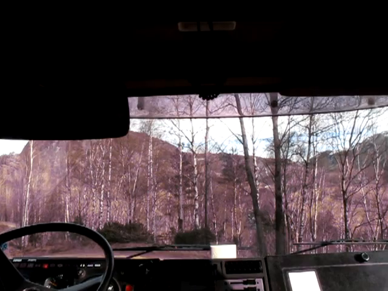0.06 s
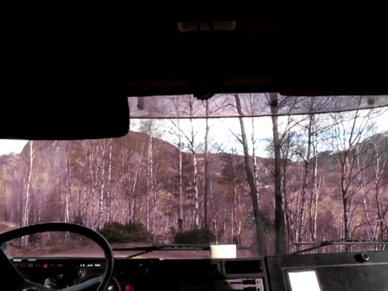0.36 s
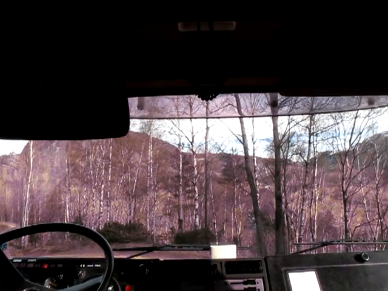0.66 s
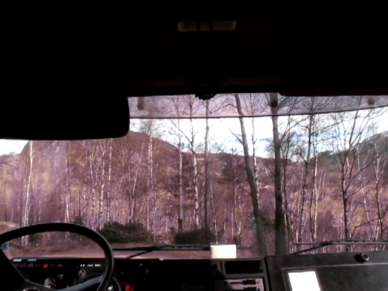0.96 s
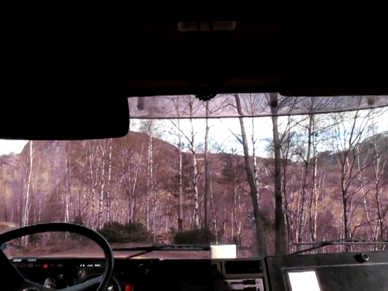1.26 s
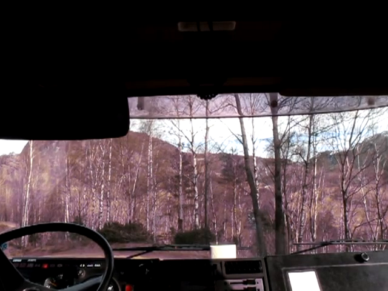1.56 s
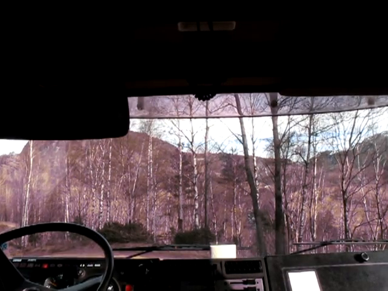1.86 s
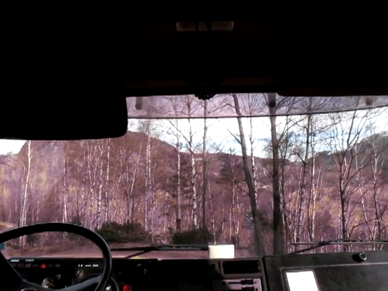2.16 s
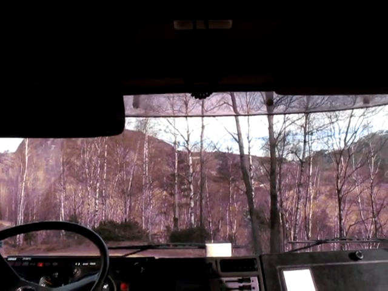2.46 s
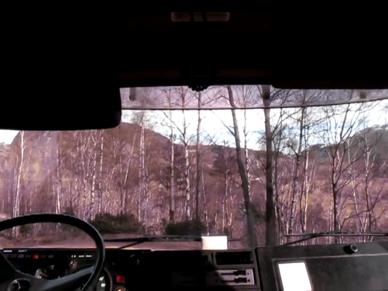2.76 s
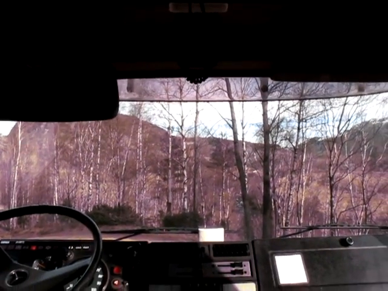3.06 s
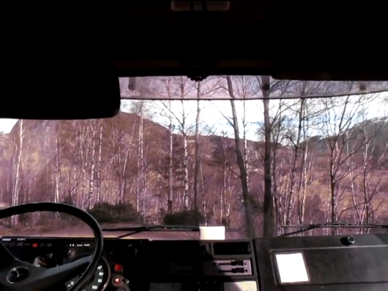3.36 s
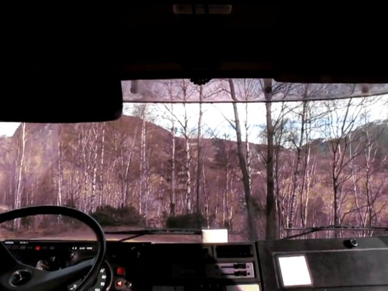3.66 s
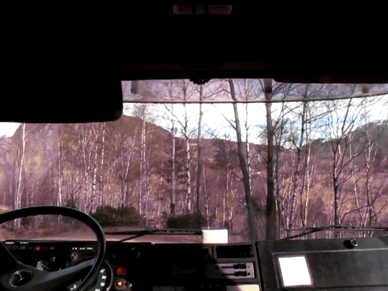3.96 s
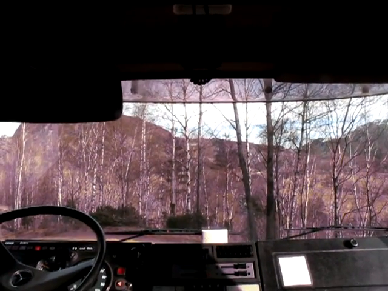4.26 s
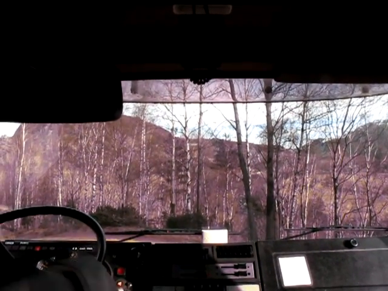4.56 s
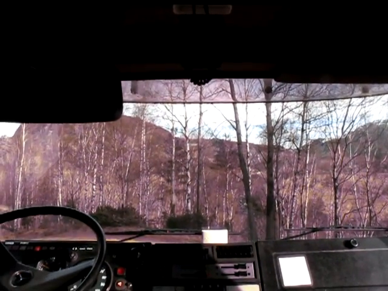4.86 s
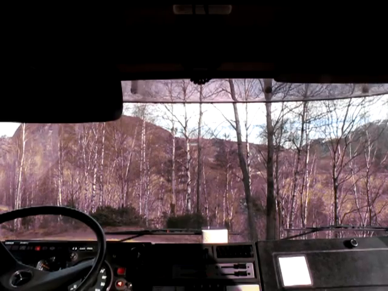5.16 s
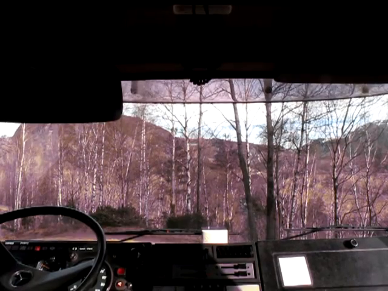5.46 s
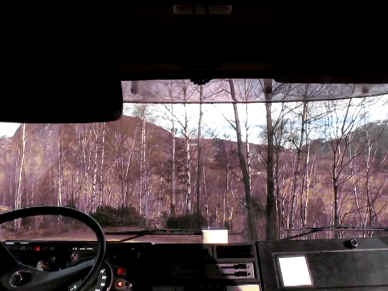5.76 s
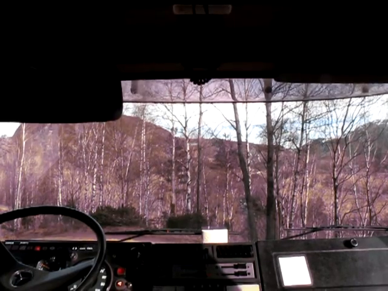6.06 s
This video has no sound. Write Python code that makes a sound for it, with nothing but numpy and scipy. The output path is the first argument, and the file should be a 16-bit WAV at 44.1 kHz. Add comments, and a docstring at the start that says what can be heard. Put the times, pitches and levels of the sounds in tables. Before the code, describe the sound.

Inside a truck cab, a diesel engine ticks over with a low rumble and clatter while air softly hisses and puffs.

```python
"""Diesel idle in the cab

A six-cylinder diesel truck ticks over at about 690 rpm, heard from inside the cab.
The firings shake the cab and boom in it; each cylinder's knock rings the block and the panels.
Now and then air hisses through a valve in long swells, short ringing puffs and thin squeals."""
import sys
import numpy as np
from scipy import signal
from scipy.fft import rfft, irfft, next_fast_len
from scipy.io import wavfile
from scipy.ndimage import uniform_filter1d

SR = 44100
rng = np.random.default_rng(int(sys.argv[2]) if len(sys.argv) > 2 else 0)


def transcribe(signal):
    """Save signal, clipped to [-1, 1], as a 16-bit WAV file at the path in sys.argv[1]."""
    frames = np.atleast_2d(signal).T
    limited = np.clip(frames, -1, 1)
    pcm = np.round(limited * 32767).astype(np.int16)
    wavfile.write(sys.argv[1], SR, pcm)


N = 268569
TIME = np.arange(N) / SR
FFT_SIZE = 2 * next_fast_len(N // 2 + 8192)
HZ = np.fft.rfftfreq(FFT_SIZE, 1 / SR)
CYCLE_HZ, CYLINDERS = 5.758, 6  # one engine cycle is two turns of the crank
BAND_CENTRES_HZ = (700, 1400, 2200, 3100)  # the four parts of a blow: block, covers, clatter, tick

# tone of the rushing air: (frequency [Hz], level [dB])
AIR_TONE = [(1500, -13.5), (3000, -2.5), (4000, -4.5), (6000, -3), (7600, -2), (9100, 3.5), (10200, -2),
            (11500, -9.5), (13000, -15.5), (15000, -29)]
# long breaths through the valve: (start [s], level [dB], opening [s], hold [s], closing [s])
AIR_SWELLS = [(.05, -64.3, 0.75, .3, .15), (.955, -55, 0.035, 0.34, 0.52), (1.03, -56.5, 0.13, .03, .22),
              (1.62, -63, .24, .03, 0.33), (3.96, -59, 0.018, 0.084, 0.35), (4.21, -57, 0.13, .01, 0.37),
              (4.48, -55, 0.385, .02, .08), (5.06, -60, 0.19, .01, 0.33), (5.72, -62, 0.25, .15, .2)]
# short spurts of air: (start [s], level [dB], length [s], brightness [0-1], sag [dB/s])
AIR_PUFFS = [(1.365, -64, 0.122, .3, 3), (1.496, -55, 0.039, 0.6, 0), (1.543, -54, 0.066, 0.27, 0),
             (1.617, -55.5, 0.045, 0.4, 0), (2.029, -52, 0.018, 0.7, 0), (2.055, -55, 0.025, 0.7, 0),
             (2.52, -52.5, .003, 0, 0), (2.56, -57, .004, .2, 0), (2.632, -55, .005, .2, 0),
             (2.974, -45.5, 0.024, 0.7, 270), (4.843, -53, 0.06, 0.8, 50), (5.918, -50.5, 0.021, 0.03, 80),
             (5.963, -46.5, 0.023, 0.2, 270)]
# resonances of the valve body: (frequency [Hz], width [Hz], boost [dB])
VALVE_MODES = [(3755, 130, 6), (4600, 100, 3), (5170, 90, 2), (5920, 130, 5), (6230, 220, 6),
               (6860, 150, 5), (8820, 190, 7)]
# notes the valve sings as it seats: (start [s], pitch [Hz], level [dB], length [s])
VALVE_SQUEALS = [(1.335, 3760, -70, .14), (1.36, 4650, -69.5, .1), (1.5, 3768, -68, .165),
                 (1.5, 6905, -71, .165), (1.615, 8820, -64.5, .062), (2.032, 3760, -70, .055),
                 (2.032, 6850, -66, .055), (2.032, 8830, -62, .06), (2.975, 8850, -62.5, .036),
                 (5.924, 6200, -61.5, .018), (5.968, 6200, -58, .022)]
# tone of the cab's rumble: (frequency [Hz], level [dB])
RUMBLE_TONE = [(8, -38), (16, -1), (21, 0), (26, -6), (35, -3.5), (48, -14.5), (85, -19), (130, -24),
               (172, -17.5), (215, -24), (260, -28), (350, -37), (600, -52.5), (3000, -120)]
# thumps that reach the cab: (place in cycle [0-1], level [dB])
CAB_THUMPS = [(0.131, -8.7), (0.177, -6.8), (0.375, -1.7), (0.467, 2.0), (0.548, -2.0), (0.714, -2.1),
              (0.774, -0.2), (0.922, -0.5)]
# partials of the drone: (order [x cycle rate], level [dB])
DRONE_ORDERS = [(5, -44.1), (7, -39.2), (8, -51.1), (9, -44.6), (10, -56.6), (11, -54.6), (12, -46.2),
                (13, -53.9), (16, -50.4), (17, -58.3), (18, -50.9), (19, -59), (20, -51.4), (22, -58.3),
                (24, -49.0), (25, -55.1), (27, -47.3), (28, -53.9), (29, -50.6), (30, -45.9), (31, -55.3),
                (33, -50.9), (34, -58), (35, -57.2), (36, -60), (42, -52), (48, -65), (51, -65),
                (54, -58.6), (59, -68)]
# fader ride on the cab's boom: (time [s], level [dB])
BOOM_RIDE = [(0, 0.5), (.5, 0.8), (.8, 1), (1.05, -0.5), (1.4, 0.5), (1.62, 2.5), (1.85, -0.5),
             (2.25, -0.5), (2.65, 1.3), (3.15, -1.5), (3.35, 0), (4.3, -0.5), (4.6, -2), (4.85, 0.7),
             (5.4, -1.5), (5.9, 0)]
# the lope, a slow rocking of the cab: (order [x cycle rate], level [dB])
LOPE_ORDERS = [(3, 0.5), (4, -7)]
# unbalanced fan and pulleys beating with the lope: (frequency [Hz], level [dB], beat crest [s])
UNBALANCED_PARTS = [(16.4, -6.5, .86), (20.04, -10.5, .21), (20.51, -9.5, .23)]
# fader ride on the deep throb at the firing rate: (time [s], level [dB])
THROB_RIDE = [(0.06, 2), (0.3, -1.5), (0.41, 3.7), (0.66, -1.3), (0.77, 2), (1.04, -1), (1.12, -0.2),
              (1.2, -2), (1.28, -0.5), (1.36, -0.7), (1.62, 3.5), (1.89, -3.5), (2.12, 3), (2.25, -3.5),
              (2.52, 3), (2.75, -1.5), (2.98, 3), (3.28, -3.5), (3.51, 2.5), (3.63, -2), (3.71, 0.5),
              (3.79, -1.1), (3.91, 3.5), (4.29, -2), (4.4, 3.5), (4.68, -3.5), (4.9, 2.2), (5.0, -3.5),
              (5.1, 0.8), (5.19, -4), (5.28, 2), (5.53, -4), (5.77, 3.9), (5.89, -1.5), (6.04, -0.2)]
# dull knocks through the floor: (place in cycle [0-1], level [dB])
FLOOR_THUDS = [(.004, 0), (.32, -5), (.505, -8.5), (0.676, -1.5), (.905, -5)]
# resonances of the floor: (frequency [Hz], level [dB], decay [s])
FLOOR_MODES = [(306, -2, 0.0096), (366, -3.5, .009), (441, -3, 0.0087)]
# six firings, then the valve gear:
# (place in cycle [0-1], block [dB], covers [dB], clatter [dB], tick [dB])
BLOWS = [(.014, 4, .5, -5, -5), (.128, -3, 0, 0, 2), (.329, 4, 3.5, -6, -4), (.46, 4.5, 3.5, 5, 6.5),
         (.696, 3, -4, -4, -9), (.81, -.5, 6.5, 2, 3.5), (.507, -4, -8, -1, 2), (.64, -15, -12, -7, -.5),
         (.853, -9, -4, 0, 0), (.93, -12, -4, -12, -12)]
# accents, firings that knock harder: (time [s], block boost [dB], cover boost [dB])
HARD_KNOCKS = [(.1, 0, 1.5), (.157, 0, 2), (.248, 0, 2.5), (.443, 5, 2), (.506, 0, 2.5), (.769, 0, 3.5),
               (.79, 3, 1), (.944, 3.5, 0), (1.007, 4, 0), (1.199, 3.5, 2.5), (1.237, 3, .5),
               (1.292, 4.5, 0), (1.411, 0, 3.5), (1.463, 3.5, 0), (1.659, 3.5, 0), (1.875, 5.5, 1),
               (2.396, 4, 0), (2.799, 3, 0), (2.917, 6, 0), (3.202, 5, 0), (3.668, 3, 1), (3.787, 2.5, 0),
               (3.978, 4, 1.5), (4.377, 3.5, 1), (4.417, 3.5, 0), (4.593, 4, 0), (4.785, 2, 0),
               (4.848, 0, 3.5), (5.228, 3.5, 1), (5.632, 0, 5.5), (5.69, 0, 3), (5.807, 5.5, 0),
               (5.829, 3, 1)]
# modes that each blow strikes hardest: (frequency [Hz], level [dB], time to crest [s])
PING_MODES = [(690, -51.5, .0075), (1022, -60, .0065), (1270, -64.5, .007), (1368, -61.5, .007),
              (1638, -63, .007), (1990, -69.5, .006), (2115, -69.5, .006), (2505, -71.5, .006),
              (3060, -67, .006), (3225, -66.5, .006)]
# tone of the engine through the firewall: (frequency [Hz], level [dB])
FIREWALL_TONE = [(120, -22), (230, 5), (330, -3), (580, -9), (850, -9), (1500, -15.5), (2400, -17.5),
                 (3350, -22), (3900, -23.5), (5500, -27), (7500, -27), (8900, -25), (10200, -30),
                 (15000, -56.5)]
# resonances of block and panels: (frequency [Hz], width [Hz], boost [dB])
PANEL_MODES = [(437, 30, 5.3), (499, 87, 5.9), (684, 105, 9), (795, 56, 3.7), (1008, 124, 5.7),
               (1261, 53, 6.0), (1369, 98, 7.3), (1485, 40, 3.5), (1626, 75, 5.9), (1802, 160, 2.8),
               (1968, 110, 4.6), (2135, 77, 4.4), (2508, 44, 4.8), (2717, 122, 3.6), (3058, 160, 4.0),
               (3227, 140, 5.7)]
# fader ride on the knocking, how hard the engine works: (time [s], level [dB])
LOAD_RIDE = [(0, 0), (1.1, -0.05), (1.55, 0.4), (2.2, -1), (2.7, 0), (3.3, -1.8), (3.7, -0.3), (4.4, -1),
             (4.95, 0.3), (5.45, -0.9), (5.8, .5), (6.09, -1.5)]


def amp(db):
    """Decibels to gain."""
    return 10 ** (np.asarray(db) / 20)


def unit_rms(x):
    """Scaled to rms 1."""
    return x / np.sqrt(np.mean(x ** 2) + 1e-20)


def ride_db(points):
    """A fader move through (time [s], level [dB]) points."""
    return np.interp(TIME, *np.transpose(points))


def eq_curve(points):
    """Joins (frequency [Hz], level [dB]) points on a log-frequency axis."""
    hz, db = np.transpose(points)
    return np.interp(np.log(HZ + 1), np.log(hz), db)


def resonances(modes):
    """The peaks, in dB, that a set of modes adds to an EQ curve."""
    return sum(db / (1 + (2 * (HZ - hz) / width) ** 2) for hz, width, db in modes)


def colour(x, curve_db):
    """Minimum-phase EQ: resonances ring after a blow, never before."""
    cepstrum = irfft(np.log(amp(curve_db)))
    cepstrum[1:FFT_SIZE // 2] *= 2
    cepstrum[FFT_SIZE // 2 + 1:] = 0
    return irfft(rfft(x, FFT_SIZE) * np.exp(rfft(cepstrum)))[:N]


def wander(rate_hz):
    """Random modulation of rms 1, gliding to a new value rate_hz times a second."""
    knots = np.arange(0, TIME[-1] + 1, 1 / rate_hz)
    return unit_rms(np.interp(TIME, knots, rng.standard_normal(4096)[:len(knots)]))


def strike(age, rise_s, decay_s):
    """Percussive envelope: quick attack, exponential tail."""
    return (1 - np.exp(-age / rise_s)) * np.exp(-age / decay_s)


def last_hit(cycles, place):
    """For a hit that comes once a cycle: its running number and its age in seconds."""
    since = cycles - place + 2  # two cycles ahead keeps the count positive
    return since.astype(int), since % 1 / CYCLE_HZ


def soft_knock(start_s=3.936, hz=448, level_db=-37.5):
    """One soft, hollow knock somewhere in the cab."""
    age = np.maximum(TIME - start_s, 0)
    return 2 * amp(level_db) * strike(age, rise_s=.0093, decay_s=.02) * np.sin(2 * np.pi * hz * age)


def valve_opening(start_s, rise_s, hold_s, fall_s):
    """The valve's travel, 0-1: it eases open, stays, and eases shut."""
    corners = start_s + np.cumsum([0, rise_s, hold_s, fall_s])
    return np.sin(np.pi / 2 * np.interp(TIME, corners, [0, 1, 1, 0])) ** 2


def air_hiss(gain_db=.74, leak_db=-73, flutter_db=1):
    """Turbulent air swells and fades over a faint leak as the valve opens and shuts."""
    swells = sum((amp(db) * valve_opening(start, *times)) ** 2 for start, db, *times in AIR_SWELLS)
    flow = np.sqrt(amp(leak_db) ** 2 + swells) * amp(gain_db + flutter_db * wander(260))
    return flow * unit_rms(colour(rng.standard_normal(N), eq_curve(AIR_TONE)))


def air_squeals(waver_hz=28, edge_s=.008, flutter_db=3.5):
    """A nearly shut valve sings thin, unsteady notes on its modes."""
    out = np.zeros(N)
    for start, hz, db, length in VALVE_SQUEALS:
        phase = 2 * np.pi * np.cumsum(hz + waver_hz * wander(300)) / SR
        gate = valve_opening(start, edge_s, length - edge_s, edge_s)
        out += amp(db + flutter_db * wander(200)) * gate * np.sin(phase)
    return np.sqrt(2) * out


def air_puffs(rise_s=.0034, fall_s=.0075, sputter_db=1.1, tilts_db_per_octave=(-17, 1)):
    """Sputtering spurts ring the valve and sag as pressure drops; a narrower gap sounds brighter."""
    flows = np.zeros((2, N))  # a dull jet and a bright one
    for start, db, length, bright, sag in AIR_PUFFS:
        age = np.maximum(TIME - start, 0)
        attack = 1 - np.exp(-age / rise_s)
        release = np.exp(-np.maximum(age - length, 0) / fall_s)
        spurt = amp(db - sag * np.minimum(age, length)) * attack * release
        flows += np.sqrt([[1 - bright], [bright]]) * spurt
    jets = flows * amp(sputter_db * wander(300)) * rng.standard_normal((2, N))
    valve_db = eq_curve(AIR_TONE) + resonances(VALVE_MODES)
    top_octaves = np.log2(np.maximum(HZ / 6200, 1))
    tones = [valve_db + tilt * top_octaves for tilt in tilts_db_per_octave]
    return sum(colour(jet, tone) / np.sqrt(np.mean(amp(tone) ** 2)) for jet, tone in zip(jets, tones))


def loose_trim(cycles, ticks_per_s=110, spread_db=2.5, decay_s=.0067, fizz=.71, place=.16):
    """Loose trim ticks faintly over a thin fizz, shaken once in each turn of the crank."""
    shaken = (1 + np.cos(4 * np.pi * (cycles - place))) ** 2 / 1.5  # averages 1
    hits = rng.random(N) < shaken * ticks_per_s / SR
    sizes = amp(spread_db * np.minimum(rng.exponential(1, N), 4) - 7)
    power = signal.lfilter([1], [1, -np.exp(-2 / (decay_s * SR))], (hits * sizes) ** 2)
    return unit_rms(np.sqrt(power + fizz ** 2) * rng.standard_normal(N))


def cab_rumble(cycles, level_db=-32, thump_s=.011, pulse_depth=.25):
    """Uneven combustion sways the cab and stirs its boom, most at each thump."""
    thumps = np.zeros(N)
    for place, db in CAB_THUMPS:
        offset_s = ((cycles - place + .5) % 1 - .5) / CYCLE_HZ
        thumps += amp(db) * np.exp(-(offset_s / thump_s) ** 2)
    stir = (1 - pulse_depth + pulse_depth * unit_rms(thumps)) * rng.standard_normal(N)
    return amp(level_db) * unit_rms(colour(stir, eq_curve(RUMBLE_TONE)))


def cab_drone(cycles, gain_db=.1, waver_db=.67):
    """Clean engine orders, timed by the thumps and weighted by the cab's air space."""
    places, thump_db = np.transpose(CAB_THUMPS)
    out = np.zeros(N)
    for order, db in DRONE_ORDERS:
        push = np.sum(amp(thump_db) * np.exp(-2j * np.pi * order * places))
        out += amp(db) * np.cos(2 * np.pi * order * cycles + np.angle(push))
    return np.sqrt(2) * out * amp(gain_db + waver_db * wander(25))


def engine_shake(cycles, lope_db=-19.5, throb_db=-17, hardest_place=.9262):
    """The block rocks on its mounts and throbs at the firing rate; other parts beat with the lope."""
    phase = 2 * np.pi * (cycles - hardest_place)
    lope = sum(amp(db) * np.cos(order * phase) for order, db in LOPE_ORDERS)
    main_order = LOPE_ORDERS[0][0]
    for hz, db, crest in UNBALANCED_PARTS:
        drift = 2 * np.pi * (hz - main_order * CYCLE_HZ) * (TIME - crest)
        lope += amp(db) * np.cos(main_order * phase + drift)
    swell_db = uniform_filter1d(ride_db(THROB_RIDE), size=2000)
    throb = amp(throb_db + swell_db) * np.cos(CYLINDERS * phase)
    return -np.sqrt(2) * (amp(lope_db) * lope + throb)


def floor_thuds(cycles, level_db=-47, rise_s=.003, scatter_db=2):
    """The heavier firings knock dully on the cab floor, much the same in every cycle."""
    out = np.zeros(N)
    for place, db in FLOOR_THUDS:
        count, age = last_hit(cycles, place)
        size = amp(db + scatter_db * rng.standard_normal(64))[count]
        for hz, mode_db, decay_s in FLOOR_MODES:
            out += size * amp(mode_db) * strike(age, rise_s, decay_s) * np.sin(2 * np.pi * hz * age)
    return amp(level_db) * out


def accents(hz, width_s=.02, block_top_hz=1100):
    """Gain of the blows near hz: an abrupt burn jolts the block (low) or its covers (high)."""
    column = 1 if hz < block_top_hz else 2
    times = TIME[::64]
    boost_db = sum(row[column] * np.exp(-((times - row[0]) / width_s) ** 2) for row in HARD_KNOCKS)
    return unit_rms(amp(np.interp(TIME, times, boost_db)))


def block_pings(cycles, scatter_db=1.2, detune=.005, ring_s=.05):
    """Each blow rings the block and its thin covers, every mode as hard as its band is struck."""
    out = np.zeros(N)
    mode_accents = [accents(hz) for hz, _, _ in PING_MODES]
    for place, *bands_db in BLOWS:
        count, age = last_hit(cycles, place)
        ringing = age < ring_s
        count, age = count[ringing], age[ringing]
        for (hz, db, crest), accent in zip(PING_MODES, mode_accents):
            size, pitch, phase = rng.standard_normal((3, 64))[:, count]  # fresh for every hit
            blow_db = np.interp(hz, BAND_CENTRES_HZ, bands_db)
            envelope = (age / crest * np.exp(1 - age / crest)) ** 2
            ring = np.cos(2 * np.pi * (hz * (1 + detune * pitch) * age + phase))
            out[ringing] += amp(db + blow_db + scatter_db * size) * accent[ringing] * envelope * ring
    return np.sqrt(2) * out


def knock_band(cycles, band, rise_s, decay_s, churn_db, repeat=.35, scatter_db=1):
    """Each blow is a burst of rattle over the churn of gears; part of the rattle repeats every cycle."""
    power = np.zeros(N)
    for place, *bands_db in BLOWS:
        count, age = last_hit(cycles, place)
        strength = amp(bands_db[band] + scatter_db * rng.standard_normal(64))[count]
        power += (strength * strike(age, rise_s, decay_s)) ** 2
    pattern = rng.standard_normal(round(SR / CYCLE_HZ))
    looped = pattern[(cycles * len(pattern)).astype(int) % len(pattern)]
    rattle = np.sqrt(repeat) * looped + np.sqrt(1 - repeat) * rng.standard_normal(N)
    bursts = np.sqrt(power) * accents(BAND_CENTRES_HZ[band]) * rattle
    return unit_rms(bursts + amp(churn_db) * rng.standard_normal(N))


def diesel_clatter(cycles, level_db=-46, crossovers_hz=(875, 1710, 2850, 3600)):
    """Block knock, cover rattle, clatter, injector ticks and trim, a band each, ring the panels."""
    block = knock_band(cycles, 0, rise_s=.002, decay_s=.014, churn_db=3, repeat=.4)
    covers = knock_band(cycles, 1, rise_s=.004, decay_s=.011, churn_db=-5)
    clatter = knock_band(cycles, 2, rise_s=.004, decay_s=.011, churn_db=-4.5)
    ticks = knock_band(cycles, 3, rise_s=.003, decay_s=.009, churn_db=-4.5)
    layers = (block, covers, clatter, ticks, loose_trim(cycles))
    # equal-power crossovers between neighbouring bands
    low, mid, upper, high = (1 / (1 + (HZ / hz) ** 10) for hz in crossovers_hz)
    shares = (low, mid - low, upper - mid, high - upper, 1 - high)
    drive = irfft(sum(rfft(x, FFT_SIZE) * np.sqrt(abs(share)) for x, share in zip(layers, shares)))[:N]
    return amp(level_db) * unit_rms(colour(drive, eq_curve(FIREWALL_TONE) + resonances(PANEL_MODES)))


def scene():
    """The mono mix in the cab; the harder the engine works, the louder it knocks."""
    cycles = CYCLE_HZ * TIME - .054 + .002 * wander(3)  # running cycle count; the governor hunts a little
    shake = engine_shake(cycles)
    boom = amp(ride_db(BOOM_RIDE)) * (cab_drone(cycles) + cab_rumble(cycles))
    load = amp(ride_db(LOAD_RIDE))
    knocking = load * (diesel_clatter(cycles) + block_pings(cycles) + floor_thuds(cycles))
    air = air_hiss() + air_puffs() + air_squeals()
    return (shake + boom + knocking + air + soft_knock())[None]


def record(dry):
    """A steep low-pass takes the very top off the mix."""
    low_pass = signal.firwin(511, cutoff=15700, window=("kaiser", 9), fs=SR)
    return signal.oaconvolve(dry, low_pass[None], "same")


dry = scene()
out = record(dry)
transcribe(out)
```